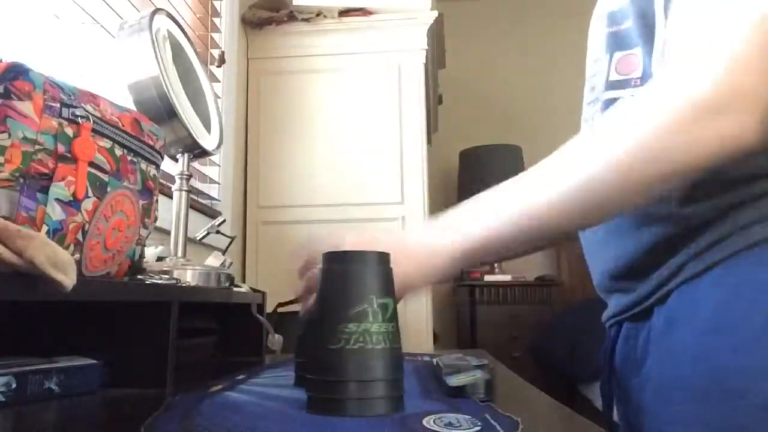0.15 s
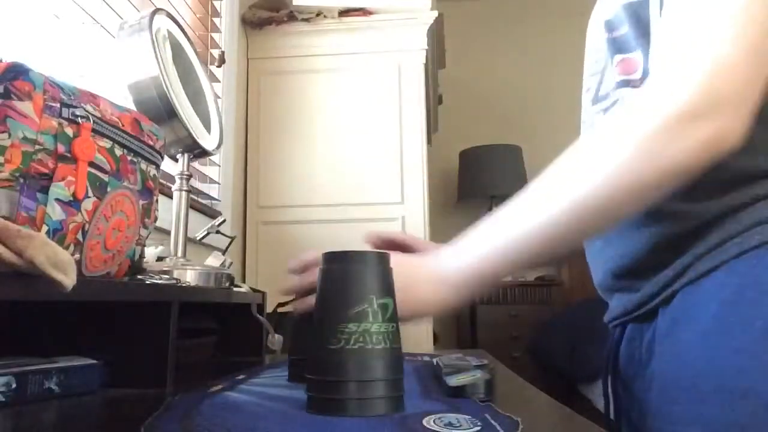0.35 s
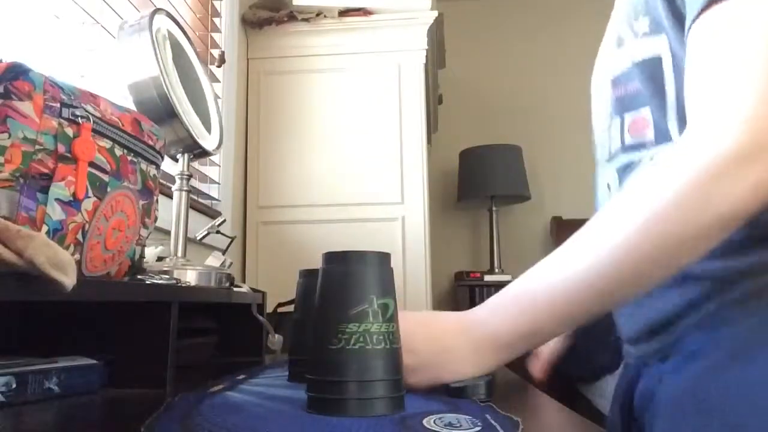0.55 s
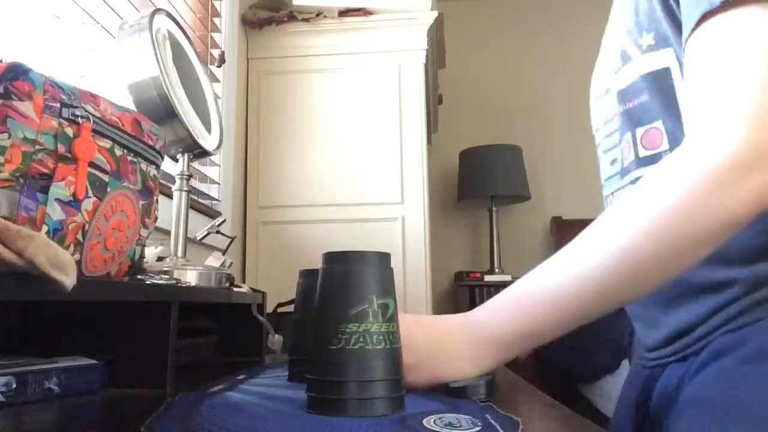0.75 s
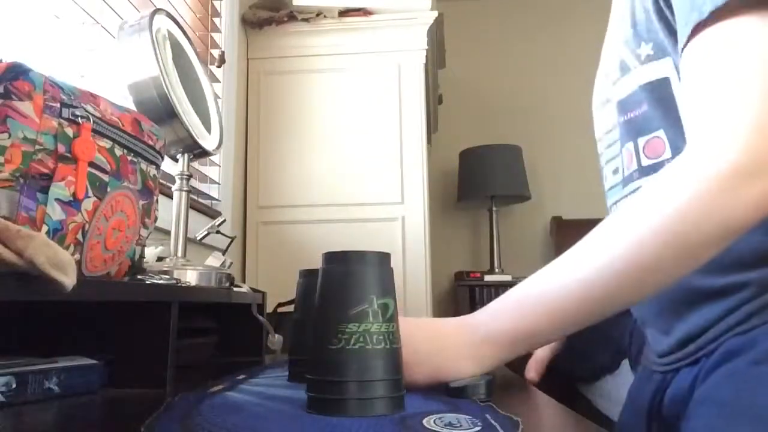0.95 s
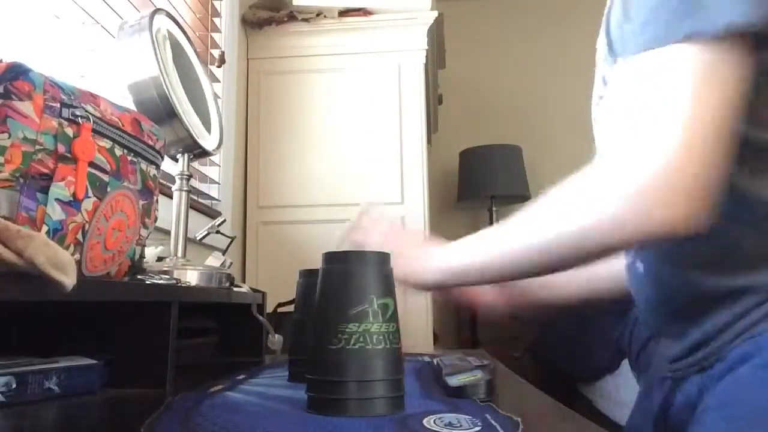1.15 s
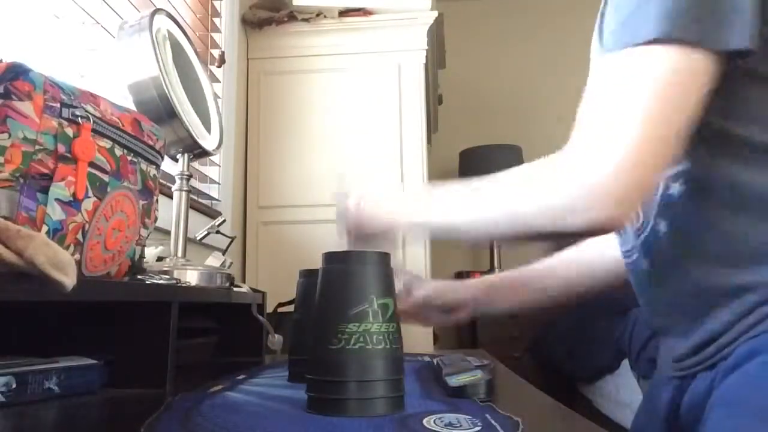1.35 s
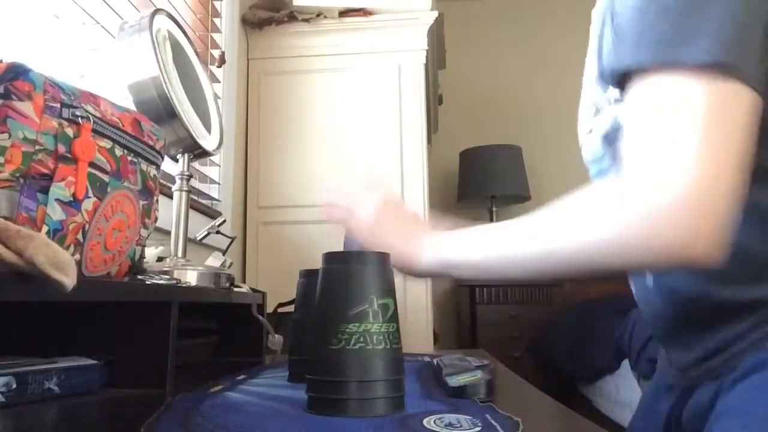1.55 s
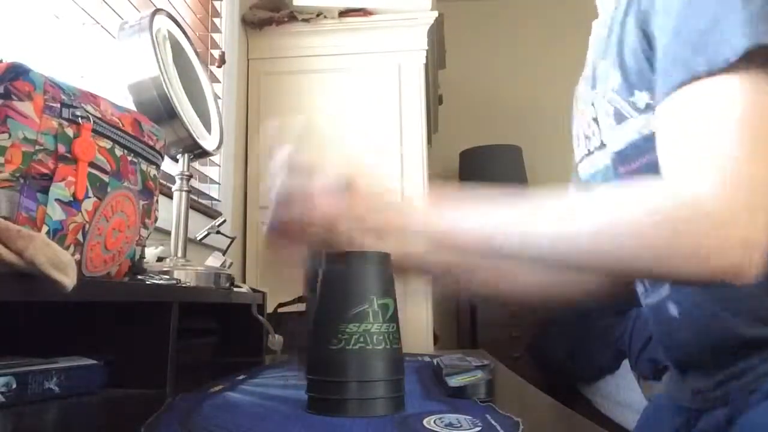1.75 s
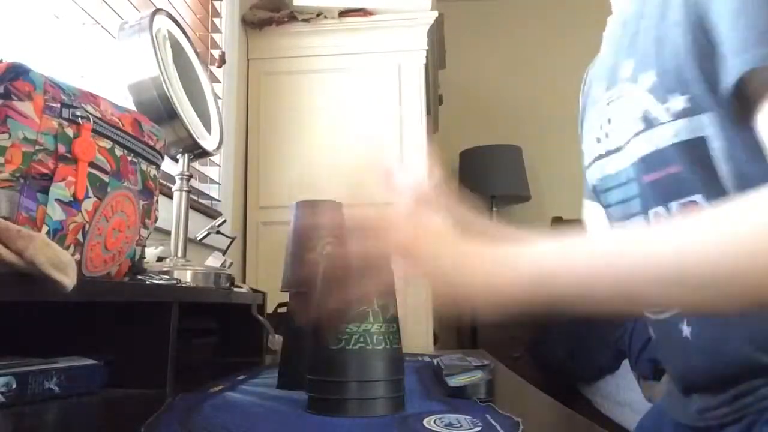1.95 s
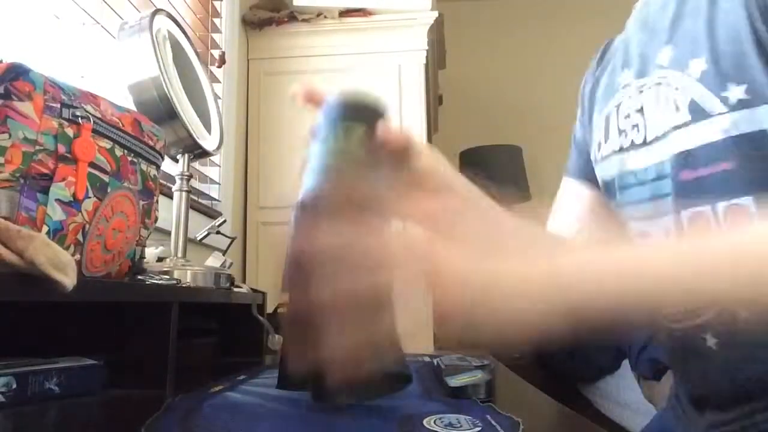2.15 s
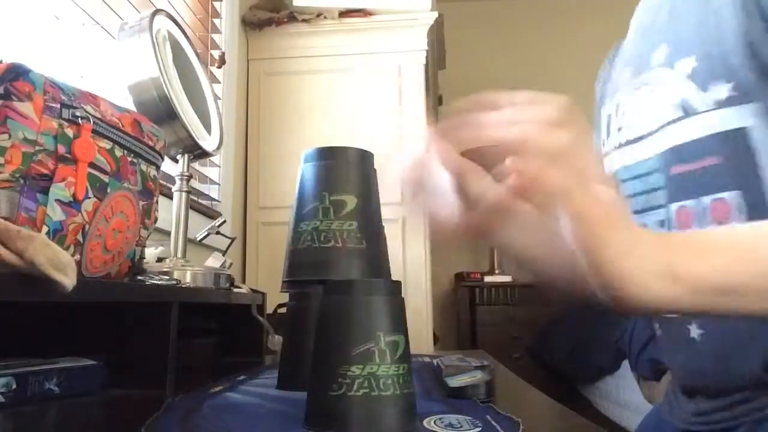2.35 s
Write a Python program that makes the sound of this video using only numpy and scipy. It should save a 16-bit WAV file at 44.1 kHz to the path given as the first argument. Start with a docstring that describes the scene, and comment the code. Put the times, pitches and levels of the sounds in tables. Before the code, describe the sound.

Plastic cups on a matted table: faint taps and a low hand thud first, a near-silent pause, then loud fast bursts of hollow knocks and rim clicks, close to a small microphone in a small bedroom.

```python
"""In a small bedroom, plastic cups are nested and pulled apart on a mat on a wooden table near a laptop microphone.
Cup walls knock hollowly and rims tick, both as sums of decaying modes; walls slide as gritty shaped noise.
Hands and stacks thud on the table by swelling its low modes. The room answers with a brief sparse tail,
over a steady hiss and a rumble that swells."""
import sys
import numpy as np
from scipy import signal
from scipy.fft import rfft, irfft
from scipy.io import wavfile
from scipy.ndimage import uniform_filter1d

SR = 44100
rng = np.random.default_rng(int(sys.argv[2]) if len(sys.argv) > 2 else 0)


def natural_amplitude(level_db):
    """Convert a level in decibels to a linear amplitude factor, elementwise."""
    exponent = np.asarray(level_db, float) / 20
    return 10 ** exponent


def to_wav(sig):
    """Store sig (one row per channel, or 1-D mono) as 16-bit WAV at the path in sys.argv[1].

    Samples outside -1..1 are clipped; the rate is SR.
    """
    pcm = np.clip(np.atleast_2d(sig), -1, 1) * 32767
    pcm = np.round(pcm).astype(np.int16)
    wavfile.write(sys.argv[1], SR, pcm.T)  # frames by channels


N = 110250  # samples, 2.5 s


def evened(x):
    """Normalization to unit root-mean-square."""
    return x / np.sqrt(np.mean(x ** 2) + 1e-20)


def peaked(x, db):
    """Normalization to a peak level in dB."""
    return natural_amplitude(db) * x / (abs(x).max() + 1e-20)


def read(points, hz):
    """Interpolation of a frequency table along a logarithmic axis."""
    f, value = np.transpose(points)
    return np.interp(np.log(hz + 1), np.log(f + 1), value)


def add(mix, s, sound):
    """Superposition: a sound joins the mix at s seconds, cut at the end."""
    part = mix[max(round(s * SR), 0):][:len(sound)]
    part += sound[:len(part)]


def ring(hz, db, t60, rise, t):
    """Modal superposition: sines of random phase swell quickly and decay exponentially."""
    hz, db, t60, rise = (np.reshape(v, (-1, 1)) for v in (hz, db, t60, rise))
    phase = 2 * np.pi * (hz * t + rng.random(hz.shape))
    envelope = natural_amplitude(db - 60 * t / t60) * (1 - np.exp(-t / rise)) ** 2
    return (envelope * np.sin(phase)).sum(0)


def shaped(count, gain):
    """Spectral shaping: white noise coloured by a gain rule over frequency."""
    spectrum = rfft(rng.standard_normal(count))
    hz = np.fft.rfftfreq(count, 1 / SR) + 1
    return evened(irfft(spectrum * gain(hz), count))


def knock(db, hz, crack_db, decay_scale):
    """Modal excitation: wall modes near the struck region ring loudest, together with a short crack."""
    # cup wall modes: f/Hz, relative level/dB, base t60/s
    walls = [(263, 3, 0.078), (350, 3.5, 0.082), (449.7, 5.5, 0.053), (557, 3.5, 0.04), (630, -3, 0.034),
             (700, 0, 0.054), (794, 2, 0.049), (899, -5, 0.074), (950, 2.5, 0.026), (1082, 4, 0.033),
             (1246, 9, 0.016), (1482, 4, 0.017), (1880, 3.5, 0.049), (2260, -33.5, .03)]
    # stiff upper wall modes: f/Hz, relative level/dB, t60/s
    stiff_modes = [(1400, -2, .014), (1700, 0, .014), (2000, 0, .013), (2300, 0, .012), (2600, 0, .012),
                   (2900, -1, .011), (3250, -2, .011)]
    focus_db_per_oct2, rise_cycles = 10, 0.33
    wall_detune, crack_detune = 0.016, 0.06  # standard deviation, share of frequency
    t = np.arange(6000) / SR
    f, level, t60 = np.repeat(walls, 2, axis=0).T  # each mode is a detuned pair
    f = f * (1 + wall_detune * rng.standard_normal(len(f)))
    level = level - focus_db_per_oct2 * np.log2(f / hz) ** 2
    body = ring(f, level, t60 * max(decay_scale, 0.1), rise_cycles / f, t)
    g, crack_level, crack_t60 = np.transpose(stiff_modes)
    g = g * (1 + crack_detune * rng.standard_normal(len(g)))
    crack = ring(g, crack_level, crack_t60, rise_cycles / g, t)
    return peaked(body, db) + peaked(crack, db + crack_db)


def tick(db, hz, t60):
    """Localized modal excitation: rim modes near the struck pitch ring briefly over a fizz of like colour."""
    # rim modes: f/Hz, relative level/dB
    rim_modes = [(3100, 1.5), (4050, 0.5), (4700, 2), (5700, 5), (6700, -22.5), (8050, 4), (9500, 1),
                 (11500, -6), (13500, 8)]
    focus_db_per_oct, fizz_db = 9.5, -11.5  # fizz peak relative to the ring's
    rim_t60_s, rim_spread, rise_cycles = 0.013, 0.045, 0.33
    t = np.arange(2048) / SR

    def focus(x):
        return -focus_db_per_oct * abs(np.log2(x / hz))

    f, level = np.repeat(rim_modes, 3, axis=0).T  # each mode is a cluster of three
    f = f * (1 + rim_spread * rng.standard_normal(len(f)))
    chime = ring(f, level + focus(f), np.full(len(f), rim_t60_s), rise_cycles / f, t)
    fizz = shaped(len(t), lambda x: natural_amplitude(focus(x)))
    fizz = fizz * natural_amplitude(-60 * t / max(t60, 0.002)) * np.minimum(t / 0.0003, 1)
    return peaked(peaked(chime, 0) + peaked(fizz, fizz_db), db)


def slide(length, db, hz):
    """Sliding friction: band-shaped noise with random grit swells fast and fades."""
    width_oct, grit_db = 1.5, 3.0  # grit: rms of the level wander
    n = 2 * int(length * SR / 2)
    u = np.arange(n) / n
    grit = natural_amplitude(grit_db * evened(uniform_filter1d(rng.standard_normal(n), 60)))
    noise = shaped(n, lambda x: np.exp(-(np.log2(x / hz) / width_oct) ** 2))
    stroke = np.sin(np.pi * u ** 0.32) ** 1.18  # crests early
    return natural_amplitude(db) * stroke * evened(grit * noise)


def thud(db, hz, soft):
    """Plate resonance: a soft push swells the low modes of the table top; no two landings alike."""
    # side modes of the board: central f/Hz, level/dB relative to the main mode, t60/s
    side_modes = [(157, -12.5, 0.049), (210.3, -8, 0.11), (269.6, -10.5, 0.06), (343, -14, 0.1),
                  (55, -19, .1), (35.8, -16.5, 0.086)]
    main_t60_s, side_detune = 0.11, 0.08  # detune: standard deviation of side-mode frequency, as a share
    f, level, t60 = np.transpose([(hz, 0, main_t60_s)] + side_modes)
    f[1:] *= 1 + side_detune * rng.standard_normal(len(side_modes))
    return peaked(ring(f, level, t60, max(soft, 0.0003), np.arange(9000) / SR), db)


def room(x):
    """Reverberation: sparse reflections of random sign, each band decaying at its own rate."""
    # reverberation time: f/Hz, t60/s
    decay_times = [(100, 0.39), (300, 0.16), (800, 0.25), (2000, 0.21), (5000, 0.26), (12000, .15)]
    delay_s, spacing = 0.0036, 12  # spacing in samples, one tap in each
    taps = np.zeros(SR // 2)
    at = np.arange(int(delay_s * SR), len(taps) - spacing, spacing)
    taps[at + rng.integers(0, spacing, len(at))] = rng.choice([-1., 1.], len(at))
    hz, t, z = signal.stft(taps, SR, nperseg=256)
    decay = natural_amplitude(-60 * t / read(decay_times, hz)[:, None])
    tail = signal.istft(z * decay, SR, nperseg=256)[1]
    return signal.fftconvolve(x, tail / np.linalg.norm(tail))[:N]


def air():
    """Background noise: room tone of steady smooth hiss, with a rumble that swells at random."""
    # room tone colour: f/Hz, relative spectral level/dB
    tone_colour = [(15, -13), (25, -27), (121, -15.5), (295, -36.5), (494, -29), (849, -39), (7440, -47.5),
                   (9240, -46.5), (12500, -50), (16300, -36)]
    tone_db, swell_db, rumble_hz = -58, 7, 220  # rms before the swell; rms of the swell; rumble lies below
    swell = evened(uniform_filter1d(uniform_filter1d(rng.standard_normal(N), 1500), 1500))
    tone = shaped(N, lambda x: natural_amplitude(read(tone_colour, x)))
    low = signal.sosfiltfilt(signal.butter(2, rumble_hz, fs=SR, output="sos"), tone)
    hiss = tone - low
    return natural_amplitude(tone_db) * (hiss + low * natural_amplitude(swell_db * swell))


def scene():
    """Linear superposition of all contacts, their room tail and the room tone."""
    # cup walls knocked: t/s, wall peak level/dB, loudest region f/Hz, crack level/dB re wall, multiple of base t60
    knocks = [(0.002, -28, 670, -6.5, 1), (0.004, -37, 1880, -33, 4.7), (0.011, -31.5, 400, -3, 0.62),
              (0.046, -29, 730, -25, 0.52), (0.05, -44, 1880, -30, 2), (0.062, -42.5, 744, -9, 1.4),
              (0.139, -44, 573, -13, 0.5), (0.195, -45, 460, -18, 1.05), (0.25, -36, 630, -21, 1.3),
              (0.259, -40, 625, -20, 1.1), (0.275, -35.5, 403, -40, 2), (0.284, -29, 370, -13.5, 0.91),
              (0.338, -41, 337, -28, 0.39), (0.517, -26, 620, -5.5, .7), (0.523, -22, 347, -17, 0.42),
              (0.53, -21.5, 444, -14.5, 0.58), (0.644, -52, 460, 1, 0.62), (0.695, -45.5, 400, -3.5, 0.71),
              (0.729, -41, 410, -7, 1.3), (0.806, -43.5, 370, -4.5, 0.72), (0.812, -43, 1190, -11, 1.2),
              (0.956, -54.5, 350, -29, 1.1), (1.334, -25.5, 410, -18, 1.1), (1.39, -26, 900, 1, 1.27),
              (1.414, -22.5, 460, -21, 0.54), (1.444, -24, 550, -24, 0.45), (1.514, -27.5, 500, -32, 1.3),
              (1.531, -33.5, 630, -12, 1), (1.543, -22.5, 520, -12, .7), (1.553, -1, 700, -4.5, 0.96),
              (1.556, -3, 480, -15, 0.57), (1.563, -6.5, 423, -32, 0.77), (1.569, -2, 1000, -23, 0.43),
              (1.575, 2, 600, -9, 0.54), (1.582, -4.5, 500, -19, 0.4), (1.59, -10, 600, -9, 1.5),
              (1.604, -19.5, 433, -5, 0.63), (1.66, -32.5, 520, -71, 1.7), (1.71, -32.5, 510, -11, 1.3),
              (1.79, -29, 500, -2, 0.76), (1.858, -38, 322, -23, 1.3), (1.868, -39.5, 400, -38, 2.3),
              (1.894, -3, 875, -0.5, 0.92), (1.902, 1, 700, -33, 0.64), (1.912, -8, 380, -13, 0.39),
              (1.925, -33, 910, -5, 0.51), (1.932, -4, 950, -15.5, 1.6), (1.937, -4.5, 860, -10.5, 0.91),
              (1.947, -3, 800, -22, 0.61), (1.953, -5, 400, -15, 0.83), (1.96, -10, 440, -19, 0.55),
              (2.01, -20, 945, -27, 0.88), (2.075, -23.5, 470, -9, 0.52), (2.081, -24.5, 1220, -10, 0.4),
              (2.157, -11, 617, -7.5, 1.2), (2.162, -1.5, 417, -19, 0.45), (2.173, -22, 407, -8, 0.86),
              (2.201, -32.5, 1700, -0.5, 0.64), (2.217, -44, 1300, -12, 1.9), (2.277, -5.5, 656, -11, 0.45),
              (2.281, 1, 490, -16.5, 0.41), (2.295, -6, 463, -8, 1.66), (2.302, -7, 1080, -13, 1.36),
              (2.313, -4, 740, -33, 1.1), (2.322, 0, 425, -37, 0.49), (2.33, -7, 414, -13, 0.73),
              (2.345, -16.5, 700, -11, 0.62), (2.37, -27, 950, -30, 1.8)]
    # rims clicking together: t/s, peak level/dB, pitch f/Hz, fizz t60/s
    ticks = [(0.0014, -35, 3580, 0.06), (0.2513, -52, 3720, 0.02), (0.2583, -50, 8270, 0.024),
             (0.5143, -43, 4270, 0.04), (0.523, -33, 4630, 0.0097), (0.646, -48, 6000, 0.032),
             (0.6975, -44, 4240, 0.022), (0.729, -52, 4260, 0.017), (0.8054, -52, 4190, 0.02),
             (1.073, -46, 8990, 0.024), (1.0927, -43.5, 4000, 0.031), (1.3304, -55, 8580, 0.011),
             (1.3893, -31, 3870, 0.047), (1.4427, -39.5, 3910, 0.02), (1.555, -30, 3660, 0.05),
             (1.5681, -8.5, 5680, 0.042), (1.5744, -23, 5500, 0.036), (1.5834, -13, 5950, 0.037),
             (1.6994, -49, 4400, 0.02), (1.7559, -37, 7500, 0.027), (1.7864, -44, 5100, 0.027),
             (1.7935, -39, 3770, 0.025), (1.814, -36.5, 4740, 0.04), (1.8961, -31, 3500, 0.013),
             (1.9032, -18.5, 3580, 0.022), (1.925, -14.5, 5300, 0.031), (1.932, -9.5, 5320, 0.06),
             (1.9394, -10, 6020, 0.043), (1.9442, -10.5, 4060, 0.049), (1.9594, -17, 4210, 0.06),
             (2.009, -29, 4430, 0.02), (2.0748, -32, 5400, 0.022), (2.08, -34, 5170, 0.02),
             (2.1593, -14.5, 4090, 0.036), (2.202, -29, 4270, 0.02), (2.2164, -28.5, 5040, 0.023),
             (2.277, -22.5, 4160, 0.015), (2.2828, -26, 5120, 0.05), (2.2945, -17, 3700, 0.04),
             (2.3032, -9, 5530, 0.053), (2.3098, -10.5, 5360, 0.039), (2.3233, -24, 8050, 0.013)]
    # walls, fingers and sleeves sliding: t/s, length/s, rms level before the swell/dB, centre f/Hz
    slides = [(0, 0.046, -45, 4000), (0.252, 0.2, -60.5, 5240), (0.516, 0.049, -49.5, 4630),
              (0.599, 0.29, -65.5, 6100), (0.811, 0.13, -70, 4000), (1.078, 0.032, -66, 8000),
              (1.104, 0.039, -56, 6000), (1.323, 0.1, -61.5, 6040), (1.388, 0.045, -49.5, 5000),
              (1.441, 0.057, -53, 6860), (1.536, 0.025, -51, 2980), (1.555, .02, -42, 7000),
              (1.578, 0.068, -35, 6000), (1.892, 0.049, -49, 6000), (2.285, .02, -62, 5650),
              (1.703, 0.13, -62, 6950), (1.75, 0.049, -49, 7800), (1.79, 0.037, -49, 6800),
              (1.838, 0.043, -45.5, 7550), (1.944, 0.068, -30, 5560), (2.072, 0.03, -39.5, 6200),
              (2.119, 0.043, -48, 8300), (2.157, 0.024, -28.5, 5150), (2.194, 0.056, -44.5, 7050),
              (2.295, 0.068, -30.5, 5700), (0.248, 0.11, -53, 480), (1.879, 0.048, -42.5, 880),
              (1.885, .02, -48, 3000), (2.147, 0.036, -47, 490), (2.249, 0.061, -46.5, 584),
              (2.222, 0.017, -43, 7000), (0.515, 0.032, -38.5, 1980), (0, 0.08, -51.5, 3300),
              (1.937, 0.036, -38, 4100)]
    # hands and stacks landing on the table top: t/s, peak level/dB, board pitch f/Hz, swell time/s
    thuds = [(0.0, -20, 135, 0.001), (0.093, -32.5, 85, 0.0069), (0.141, -35.5, 78, 0.0033),
             (0.259, -19.5, 109.3, 0.0058), (0.286, -24, 141, 0.0057), (0.341, -27.5, 96.9, 0.0019),
             (0.522, -6, 88.9, 0.0049), (0.6, -49, 96.9, 0.0035), (0.698, -31, 118.7, 0.0041),
             (0.805, -50, 139, 0.003), (0.89, -43.5, 122, 0.0019), (0.953, -27, 102, 0.0047),
             (1.118, -40.5, 89, 0.0018), (1.147, -40, 102, 0.0033), (1.329, -16, 105.2, 0.0041),
             (1.414, -21, 117, 0.0013), (1.445, -27, 112, 0.0049), (1.549, -12.5, 131.6, 0.0023),
             (1.574, -11.5, 114, 0.0012), (1.595, -16.5, 122, 0.003), (1.697, -33, 102, 0.0048),
             (1.79, -31.5, 111.5, 0.0035), (1.857, -30, 108, 0.0016), (1.897, -8.5, 128.3, 0.0015),
             (1.935, -21.5, 90, 0.0022), (1.955, -15, 135, 0.0014), (2.056, -21.5, 90, 0.0021),
             (2.09, -27, 74, 0.0034), (2.158, -10, 136.4, 0.0013), (2.277, -11.5, 139.7, 0.0028),
             (2.295, -11.5, 114.7, 0.003), (2.309, -10, 146.5, 0.0025), (2.324, -10, 125.7, 0.0012)]
    room_db, table_share = -9.5, 0.36  # the table excites the room less
    table, cups = np.zeros(N), np.zeros(N)
    layers = ((table, thuds, thud), (cups, knocks, knock), (cups, ticks, tick), (cups, slides, slide))
    for mix, rows, source in layers:
        for s, *row in rows:
            add(mix, s, source(*row))
    tail = natural_amplitude(room_db) * room(cups + table_share * table)
    return (table + cups + tail + air())[None]


def top_cut(x):
    """Nothing passes above the cut-off."""
    return signal.sosfilt(signal.butter(12, 16480, fs=SR, output="sos"), x)


def record(dry):
    """Transducer response: microphone bass cut, soft saturation, treble roll-off and band limit."""
    # microphone treble response: f/Hz, level/dB
    treble = [(1000, 0), (9000, -1.5), (12000, -3), (14000, -9.5), (16000, -10.5)]
    low_hz, ceiling, edge_hz = 41.7, 1.05, 16100  # ceiling in full-scale amplitude
    x = signal.sosfilt(signal.butter(2, low_hz, "high", fs=SR, output="sos"), dry)
    x = x / (1 + abs(x / ceiling) ** 4) ** 0.25
    hz = np.linspace(0, SR / 2, 257)
    response = natural_amplitude(read(treble, hz)) * (hz < SR / 2)  # zero at the Nyquist frequency
    x = signal.oaconvolve(x, signal.firwin2(255, hz, response, fs=SR)[None], "same")
    band_limit = signal.firwin(511, edge_hz, window=("kaiser", 9), fs=SR)
    x = signal.oaconvolve(x, band_limit[None], "same")
    return top_cut(x)


dry = scene()
out = record(dry)
to_wav(out)
```